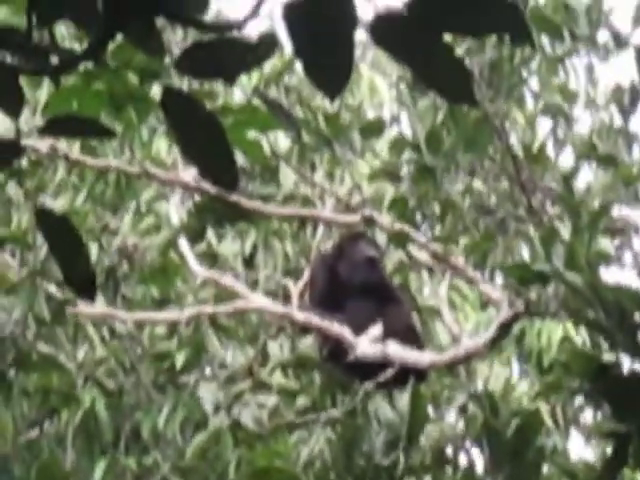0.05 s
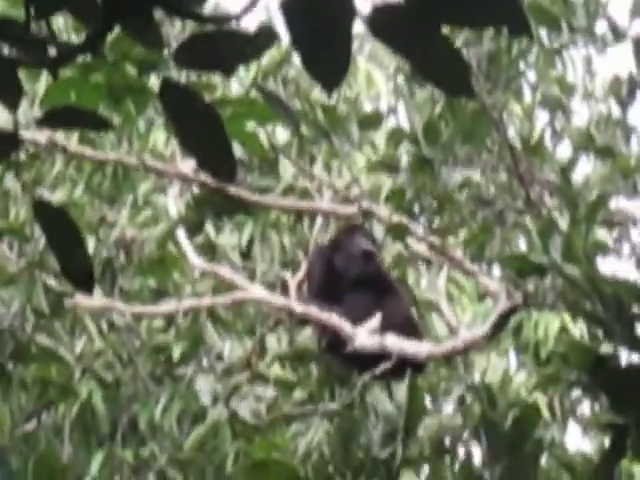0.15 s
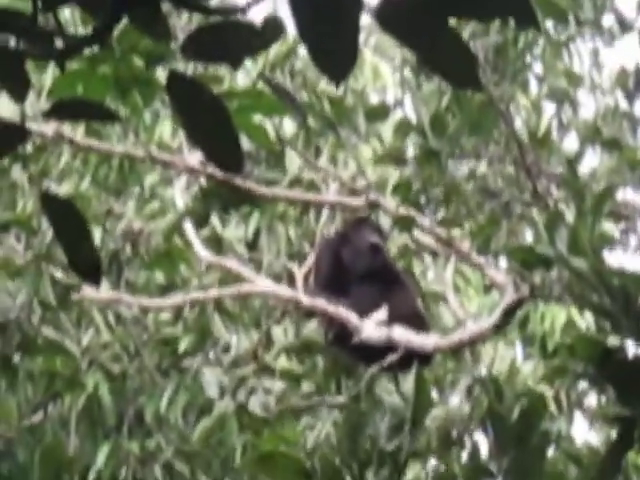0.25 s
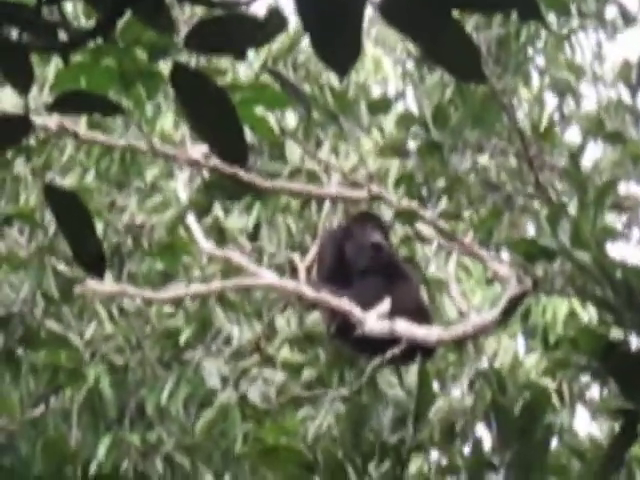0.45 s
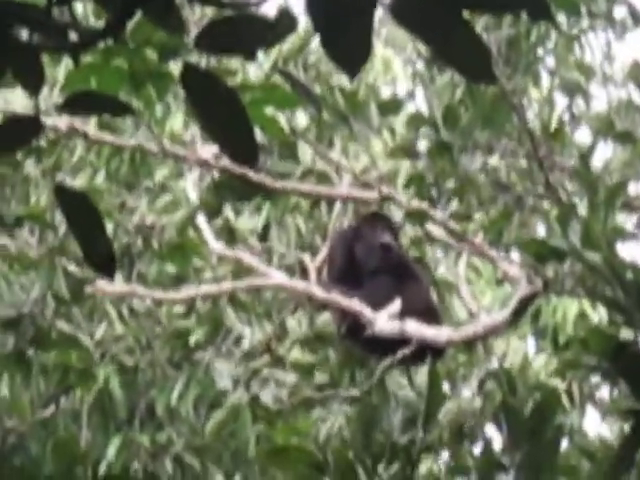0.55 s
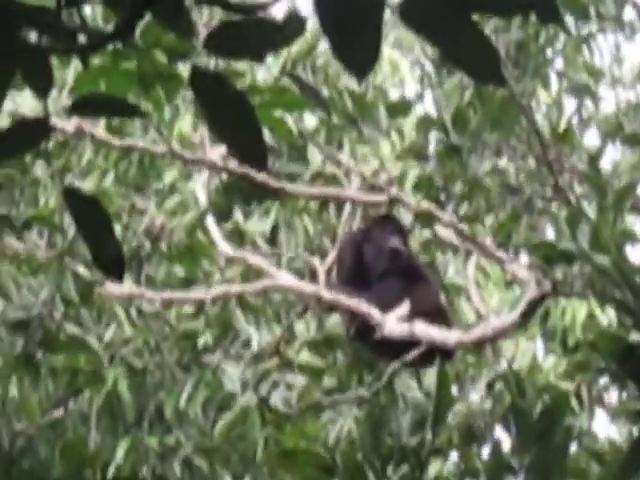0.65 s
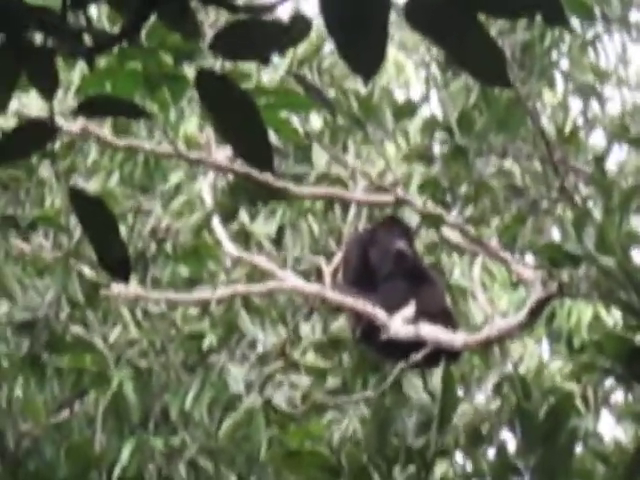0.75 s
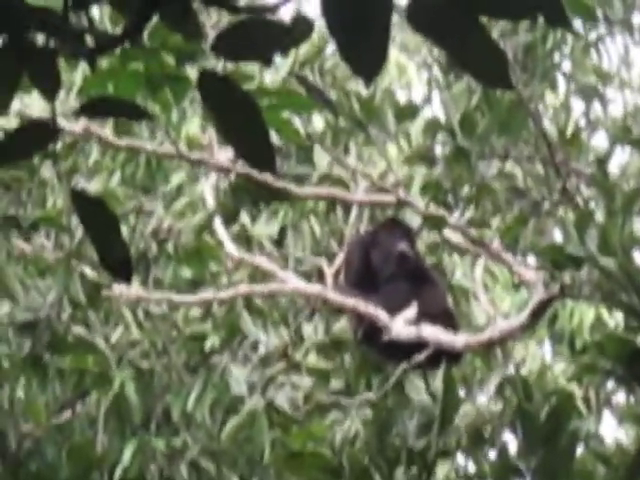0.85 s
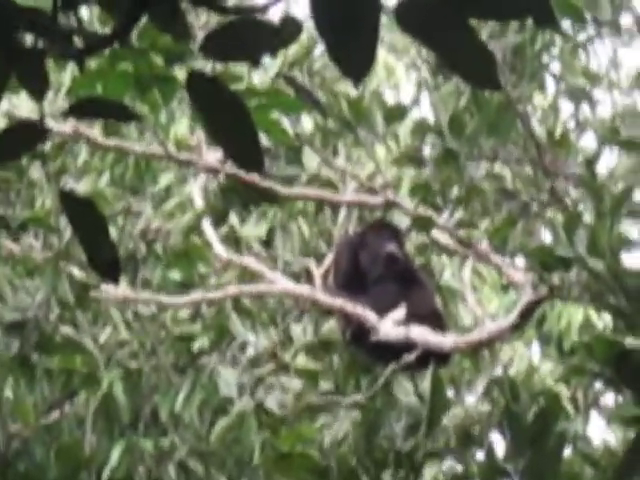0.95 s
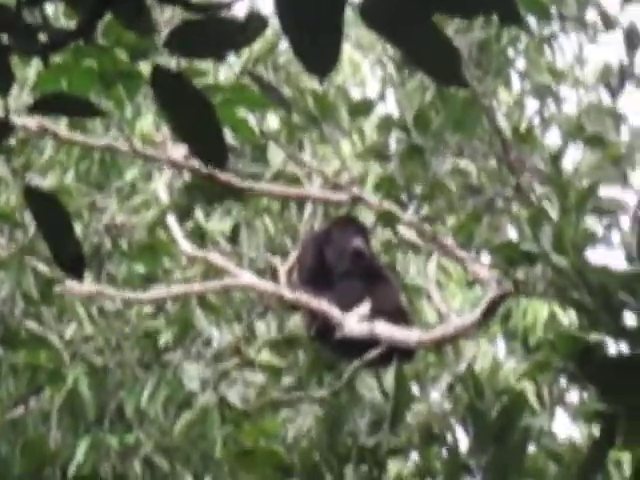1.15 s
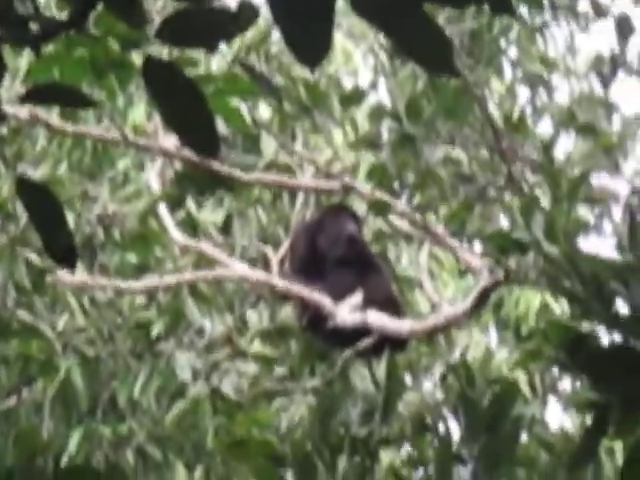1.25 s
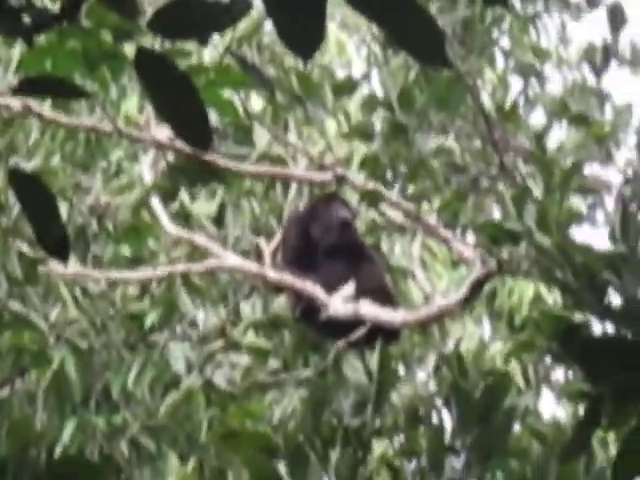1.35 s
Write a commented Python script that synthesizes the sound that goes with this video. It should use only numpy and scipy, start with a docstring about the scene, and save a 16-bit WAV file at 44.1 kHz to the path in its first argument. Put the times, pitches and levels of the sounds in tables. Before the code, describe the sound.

A howler monkey's thin rising squeak breaks into one loud, hoarse double bark, echoing through the trees; then a soft moan and second squeak over low forest murmur and faint insect whine, heard from a distance.

```python
"""A howler monkey in a treetop over a forest murmur and a faint insect whine, both noise-driven.
A thin rising squeak with a noise rasp leads into one double barking roar. A hoarse harmonic tone breaks
twice into chaotic pulses that ring the throat sac, with hiss at both peaks; it clears between and after.
Decaying noise echoes the call. A soft hoarse moan follows, then a brief high hiss and a second squeak."""
import sys
import numpy as np
from scipy import signal
from scipy.fft import rfft, irfft, next_fast_len
from scipy.io import wavfile
from scipy.ndimage import uniform_filter1d

SR = 44100
rng = np.random.default_rng(int(sys.argv[2]) if len(sys.argv) > 2 else 0)


def output_pcm(signal):
    """Save a mono or channel-first signal as 16-bit PCM at the path in sys.argv[1].

    Samples are clipped to [-1, 1] before scaling.
    """
    pcm = np.clip(np.atleast_2d(signal).T, -1, 1) * 32767
    wavfile.write(sys.argv[1], SR, np.round(pcm).astype(np.int16))


N = 61739

# chaotic roar: (time [s], level [dB])
ROAR_LEVEL = [(.172, -67), (.188, -56), (.235, -42), (.255, -34), (.285, -28.5), (.33, -26.5), (.352, -30),
              (.378, -26.5), (.405, -32), (.425, -35.5), (.5, -39), (.528, -35), (.55, -26.5), (.58, -25),
              (.608, -27.5), (.635, -26), (.67, -33), (.70, -40), (.74, -39), (.79, -81)]
# broad colour of throat and sac: (frequency [Hz], gain [dB])
THROAT_COLOUR = [(100, -52.5), (200, -18), (270, -29.5), (330, -13.5), (410, -6.5), (490, -9), (660, -1.5),
                 (900, -15), (1180, 0.5), (1380, -3.5), (1560, 1), (1820, -5), (2020, -14.5), (2230, -17.5),
                 (2420, -34), (3000, -32.5), (4500, -42), (5600, -48), (11000, -73)]
# narrow throat resonances: (frequency [Hz], width [Hz], gain over broad colour [dB])
THROAT_RESONANCES = [(1214, 21, 1), (1530, 16, -14), (1630, 45, -28), (1815, 36, -3), (2226, 59, 4.5)]
# upper resonances, opening with effort: (frequency [Hz], width [Hz], gain over broad colour [dB])
UPPER_RESONANCES = [(2831, 40, 18), (3305, 54, 13), (3648, 73, 17)]
# broad colour around the upper resonances: (frequency [Hz], gain [dB])
UPPER_COLOUR = [(1500, -31), (2500, 3), (3100, 12.5), (3480, -0.5), (3900, 2.5), (4600, -9), (6000, -27)]
# median pulse rate, log spread of the period, limit of pulse strength, puff share
ROAR_MEDIAN_HZ, ROAR_JITTER, ROAR_SCATTER_DB, ROAR_AIR = 343.2, 0.33, 0.5, 0.45
# UPPER_DB holds at full effort; growth is the exponent on effort
UPPER_DB, UPPER_GROWTH, FULL_EFFORT_DB = -46, 1.3, -25

# voiced tone: (time [s], pitch [Hz], level [dB], overtones re fundamental [dB])
TONE_TRACK = [(.178, 315, -63, 3), (.195, 321, -40.5, -3.5), (.212, 323.8, -59, 6.5),
              (.234, 374.8, -33, -15), (0.251, 363.6, -42, -1), (.275, 332.2, -35, -11.5),
              (.325, 334.5, -38, 2), (0.357, 334.8, -39.5, 3), (0.402, 360.7, -34, -4),
              (0.451, 353.6, -40, 0), (0.486, 362.5, -35, -1.5), (.508, 362.9, -31, -2.5),
              (.535, 367.7, -28, -1.5), (0.557, 357.3, -34.5, -5.5), (.59, 370.3, -72, -11),
              (.63, 369.7, -42, 1), (0.664, 364.7, -31, 0), (0.692, 347.2, -42, 4),
              (0.721, 351.2, -45.5, -10), (.77, 353, -49.5, -29), (.81, 358, -55, -20)]
# harmonics of the tone: (frequency [Hz], gain [dB])
TONE_COLOUR = [(350, -0.5), (720, 0.5), (1080, -8.5), (1450, -11.5), (1810, -9), (2170, -15.5),
               (2520, -33.5), (2880, -26), (3300, -24.5), (3700, -27.5), (5000, -53)]
# pitch unsteadiness: (time [s], rms share of pitch [ratio])
TONE_RAGGED = [(.19, 0.073), (.23, 0.0096), (.30, .02), (.36, 0.028), (.41, .008), (.53, 0.0084),
               (.60, 0.034), (.66, 0.013)]
TONE_SHIMMER_DB = 1.9

# brief shrill partials in the roar: (start [s], length [s], first [Hz], last [Hz], level [dB])
SHRILLS = [(0.177, 0.19, 1500, 1400, -48), (0.181, 0.054, 2020, 2130, -62), (0.253, 0.037, 1740, 1702, -34),
           (0.346, 0.069, 1580, 1543, -32), (0.523, 0.055, 1540, 1572, -35.5),
           (0.582, 0.049, 1555, 1527, -26.5), (0.623, 0.04, 1150, 1203, -28.5),
           (0.698, 0.094, 1200, 1140, -45)]

# air through the wide-open mouth: (start [s], release start [s], level [dB])
RUSHES = [(0.252, 0.393, -56), (0.534, 0.659, -55)]
# colour of that air: (frequency [Hz], gain [dB])
RUSH_COLOUR = [(2500, -21.5), (3700, -2), (4800, -8), (5600, -13.5), (6250, -4), (6550, 1.5), (6900, -6),
               (7700, -4.5), (8500, -2), (9200, -11.5), (9800, -6.5), (10300, -14.5), (11000, -12.5),
               (11800, -44)]
RUSH_ATTACK_S, RUSH_RELEASE_S = 0.061, 0.064

# stray low throat tones: (start [s], length [s], first [Hz], last [Hz], level [dB])
FLUTTERS = [(0.151, 0.066, 140, 160, -59), (0.173, 0.082, 407, 449, -45.5), (0.259, 0.116, 165, 115.5, -58),
            (0.263, 0.14, 225, 222.7, -53.5), (0.567, 0.097, 235, 261, -51.5)]

# squeaks: (start [s], length [s], rise time [s], level [dB])
SQUEAKS = [(0.08, 0.14, .058, -52.5), (1.356, .11, 0.0346, -51)]
# harmonics of the squeak: (frequency [Hz], gain [dB])
SQUEAK_COLOUR = [(600, 3), (1100, -21), (1750, -12), (2300, -43), (3000, -27), (3600, -38), (4400, -19),
                 (5500, -30)]
# noise at the squeak's start: (frequency [Hz], gain [dB])
RASP_COLOUR = [(250, -33), (500, 7.5), (850, -11.5), (1080, 3.5), (1280, 4), (1500, -26), (1790, 4),
               (2000, -32), (2500, -18.5), (3100, -12), (3600, -21), (4400, -16.5), (6000, -46)]
SQUEAK_HZ, SQUEAK_RISE_HZ, RASP_RE_NOTE_DB = 485, 96, -0.5

# soft moan, one row: (start [s], length [s], first [Hz], last [Hz], level [dB])
MOAN = (1.115, .26, 334, 330, -58)
# harmonics of the moan: (frequency [Hz], gain [dB])
MOAN_COLOUR = [(345, 0), (670, -13), (1000, -19), (1200, -13), (1500, -10), (2000, -22), (3000, -35)]

# what the forest returns: (frequency [Hz], gain [dB])
ECHO_COLOUR = [(350, -4.5), (720, -0.5), (1200, -4.5), (2200, 5), (9000, 2.5)]
NEAR_DB, NEAR_T60_S = -6.5, 0.11
FAR_DB, FAR_T60_S, FAR_BUILD_S = -6.5, 0.96, 0.0083

# forest murmur: (frequency [Hz], gain [dB])
FOREST_COLOUR = [(25, -5), (60, -4.5), (110, -10.5), (220, -5), (350, 0.5), (550, -4.5), (900, -6.5),
                 (1300, -4.5), (2000, -16.5), (3000, -15.5), (5000, -19.5), (8000, -22), (10500, -24.5),
                 (11800, -41), (15500, -27)]
# faint high hiss, one row: (centre [s], Gaussian sigma [s], level [dB])
HISS = (1.3, 0.057, -65)
FOREST_DB, INSECT_HZ, INSECT_SPREAD_HZ, INSECT_DB = -58.5, 5880, 4.8, -74.5

TOP_HZ = 15650


def undb(db):
    """Decibels to gain."""
    return 10 ** (np.asarray(db) / 20)


def unit(x):
    """Scale to standard deviation 1."""
    return x / np.std(x)


def clock():
    """Time of every sample [s]."""
    return np.arange(N) / SR


def noise():
    """White noise, one value per sample."""
    return rng.standard_normal(N)


def swell(rows):
    """Gain along (time [s], level [dB]) points, corners rounded, silent outside."""
    s, db = np.array(rows).T
    order = np.argsort(s)
    gain = undb(np.interp(clock(), s[order], db[order], left=-200, right=-200))
    rounded = uniform_filter1d(uniform_filter1d(gain, size=260), size=260)
    return np.abs(rounded)


def gate(start_s, length_s, edge_s):
    """Smooth rise, hold and fall."""
    t = clock() - start_s
    to_edge = np.minimum(t, length_s - t)
    return np.sin(np.pi / 2 * np.clip(to_edge / edge_s, 0, 1))


def walk(rate_hz):
    """Smooth random motion of spread 1: noise averaged twice."""
    k = max(int(SR / rate_hz), 1)
    once = uniform_filter1d(noise(), k, mode="wrap")
    return unit(uniform_filter1d(once, k, mode="wrap"))


def gain_at(hz, points):
    """Gain read from (frequency [Hz], gain [dB]) points on a log frequency axis."""
    f, db = np.array(points).T
    return undb(np.interp(np.log(np.maximum(hz, 1)), np.log(f), db))


def colour(x, points, peaks=()):
    """Minimum-phase filter, broad colour times narrow resonances; output scaled to unit."""
    size = next_fast_len(N) * 2
    hz = np.arange(size // 2 + 1) * SR / size
    ringing = sum(undb(db) / (1 + (2 * (hz - f) / w) ** 2) for f, w, db in peaks)
    gain = gain_at(hz, points) * (1 + ringing)
    # folding the cepstrum makes the response causal
    cepstrum = irfft(np.log(gain))
    cepstrum[1:size // 2] *= 2
    cepstrum[size // 2 + 1:] = 0
    response = np.exp(rfft(cepstrum))
    return unit(irfft(rfft(x, size) * response)[:N])


def voiced(hz, points, jitter, shimmer_db, overtones_db=0, count=13):
    """Regular vocal-fold vibration: harmonics of an unsteady pitch, weighted by frequency."""
    phase = 2 * np.pi * np.cumsum(hz * (1 + jitter * walk(240))) / SR
    parts = []
    for k in range(1, count + 1):
        offset = rng.uniform(0, 2 * np.pi)
        parts.append(gain_at(k * hz, points) * np.cos(k * phase + offset))
    wave = parts[0] + undb(overtones_db) * sum(parts[1:])
    return np.sqrt(2) * wave * undb(shimmer_db * walk(100))


def glide(start_s, length_s, first_hz, last_hz, db, edge_s, waver):
    """One short wavering sine that slides in pitch."""
    hz = np.interp(clock(), [start_s, start_s + length_s], [first_hz, last_hz])
    hz = hz * (1 + waver * walk(220))
    sine = unit(np.sin(2 * np.pi * np.cumsum(hz) / SR))
    return undb(db) * gate(start_s, length_s, edge_s) * sine


def roar():
    """Uneven fold slaps, each with a puff of air, ring the throat sac; effort brightens it."""
    period, size = rng.standard_normal((N // 50, 2)).T
    at = (np.cumsum(np.exp(ROAR_JITTER * period)) * SR / ROAR_MEDIAN_HZ).astype(int)
    strength = undb(ROAR_SCATTER_DB * np.tanh(size))
    inside = at < N
    pulses = np.bincount(at[inside], strength[inside], N)
    puff_decay = np.exp(-1 / (0.0011 * SR))  # 1.1 ms
    puffs = signal.lfilter([1], [1, -puff_decay], pulses) * noise()
    folds = unit(pulses) + ROAR_AIR * unit(puffs)
    effort = swell(ROAR_LEVEL)
    throat = colour(folds, THROAT_COLOUR, THROAT_RESONANCES) * effort
    opening = (effort / undb(FULL_EFFORT_DB)) ** UPPER_GROWTH
    upper = undb(UPPER_DB) * colour(folds, UPPER_COLOUR, UPPER_RESONANCES) * opening
    return throat + upper


def tone():
    """Regular fold vibration in the roar, now hollow, now bright as the overtones vary."""
    t = clock()
    s, hz, db, overtones_db = np.array(TONE_TRACK).T
    pitch_hz = np.interp(t, s, hz)
    jitter = np.interp(t, *np.array(TONE_RAGGED).T)
    brightness_db = np.interp(t, s, overtones_db)
    wave = voiced(pitch_hz, TONE_COLOUR, jitter, TONE_SHIMMER_DB, brightness_db)
    return wave * swell(np.c_[s, db])


def shrills():
    """Sliding partials where the voice briefly locks on to a throat resonance."""
    partials = sum(glide(*row, edge_s=0.019, waver=0.0039) for row in SHRILLS)
    return partials * undb(1.5 * walk(220))


def rush():
    """Turbulent air at the two peaks of effort: coloured noise, linear attack, exponential release."""
    t = clock()
    level = 0
    for start_s, release_s, db in RUSHES:
        attack = np.clip((t - start_s) / RUSH_ATTACK_S, 0, 1)
        release = np.exp(-np.maximum(t - release_s, 0) / RUSH_RELEASE_S)
        level = level + undb(db) * attack * release
    return colour(noise(), RUSH_COLOUR) * level * undb(0.85 * walk(300))


def flutters():
    """Stray low throat vibrations beside the main pitch: wavering sines."""
    return sum(glide(*row, edge_s=0.034, waver=0.033) for row in FLUTTERS)


def squeaks():
    """Thin decaying harmonic notes, rising in pitch, with a raspy noise start."""
    out = 0
    for start_s, length_s, rise_s, db in SQUEAKS:
        age = np.maximum(clock() - start_s, 0)
        hz = SQUEAK_HZ + SQUEAK_RISE_HZ * np.minimum(age / rise_s, 1) ** 2
        rasp = undb(RASP_RE_NOTE_DB) * colour(noise(), RASP_COLOUR) * gate(start_s, 0.057, 0.005)
        note = voiced(hz, SQUEAK_COLOUR, jitter=0.0179, shimmer_db=3.0, count=9)
        note = note * gate(start_s, length_s, 0.022) * np.exp(-age / 0.15)
        out = out + undb(db) * (note + rasp)
    return out


def moan():
    """Quiet hoarse note after the roar: harmonics on a jittery pitch."""
    start_s, length_s, first_hz, last_hz, db = MOAN
    hz = np.interp(clock(), [start_s, start_s + length_s], [first_hz, last_hz])
    note = voiced(hz, MOAN_COLOUR, jitter=0.054, shimmer_db=1.5)
    return undb(db) * gate(start_s, length_s, 0.038) * note


def echoes(x):
    """Nearby branches scatter the call early; the deeper forest returns a longer tail."""
    t = clock()
    near = noise() * undb(-60 * t / NEAR_T60_S) * (t > 0.004)
    far = noise() * undb(-60 * t / FAR_T60_S) * (1 - np.exp(-t / FAR_BUILD_S))
    response = undb(NEAR_DB) * near / np.linalg.norm(near)
    response = response + undb(FAR_DB) * far / np.linalg.norm(far)
    coloured = colour(response, ECHO_COLOUR) * np.std(response)
    return signal.fftconvolve(x, coloured)[:N]


def murmur():
    """Distant jungle: coloured noise with a slow drift in level."""
    return undb(FOREST_DB) * colour(noise(), FOREST_COLOUR) * undb(0.25 * walk(5.8))


def insect():
    """Continuous whine: one sine with slight random pitch and level motion."""
    hz = INSECT_HZ + INSECT_SPREAD_HZ * walk(64)
    whine = unit(np.sin(2 * np.pi * np.cumsum(hz) / SR))
    return whine * undb(INSECT_DB + 2 * walk(40))


def high_hiss():
    """Brief high hiss: coloured noise under a Gaussian envelope."""
    centre_s, sigma_s, db = HISS
    hiss = colour(noise(), [(1500, -8), (4000, 0.5), (6500, -2), (10200, 2), (11800, -13)])
    return undb(db) * hiss * np.exp(-((clock() - centre_s) / sigma_s) ** 2 / 2)


def scene():
    """The monkey, its echo and the jungle."""
    monkey = roar() + tone() + shrills() + rush() + flutters() + squeaks() + moan()
    return (monkey + echoes(monkey) + murmur() + insect() + high_hiss())[None]


def record(dry):
    """Steep elliptic low-pass at TOP_HZ."""
    sos = signal.ellip(10, 0.2, 80, TOP_HZ, fs=SR, output="sos")
    return signal.sosfilt(sos, dry)


dry = scene()
out = record(dry)
output_pcm(out)
```